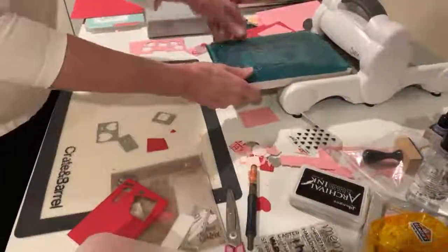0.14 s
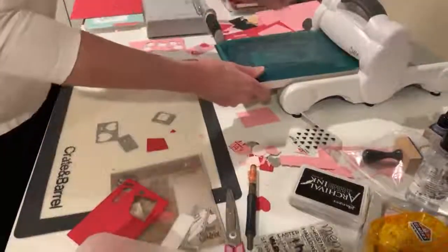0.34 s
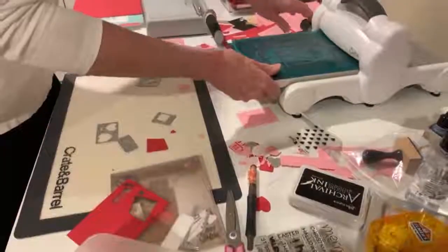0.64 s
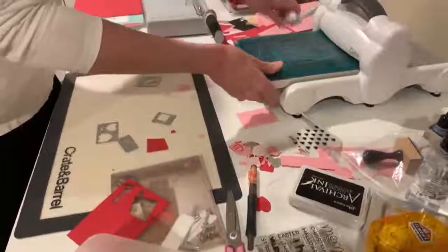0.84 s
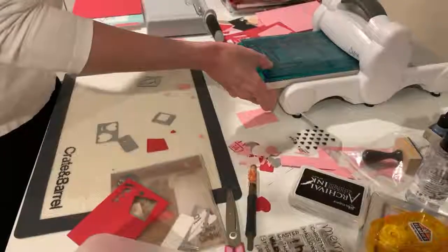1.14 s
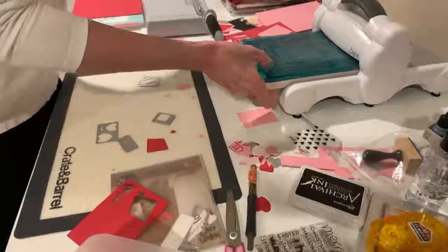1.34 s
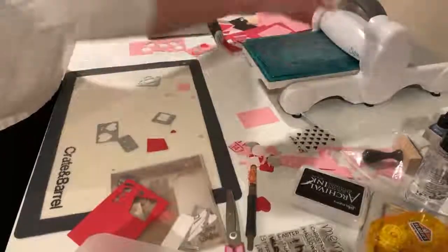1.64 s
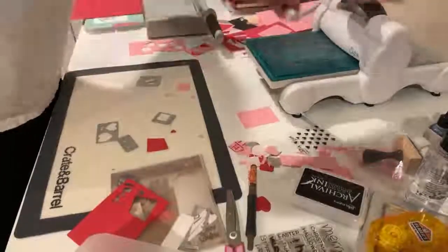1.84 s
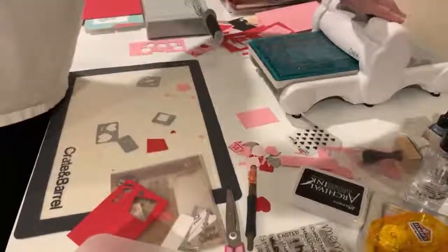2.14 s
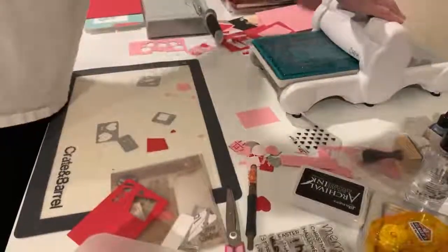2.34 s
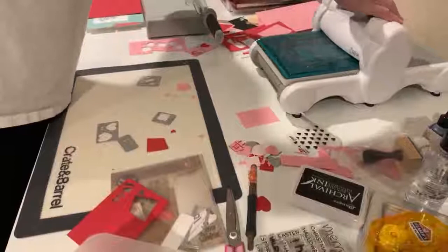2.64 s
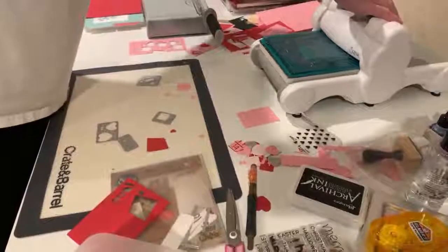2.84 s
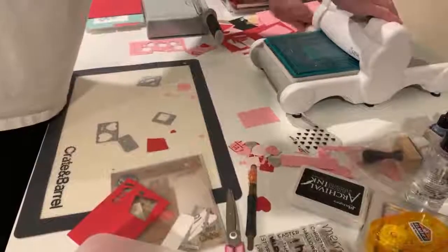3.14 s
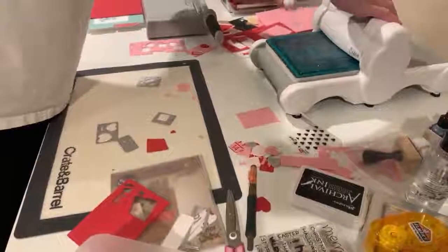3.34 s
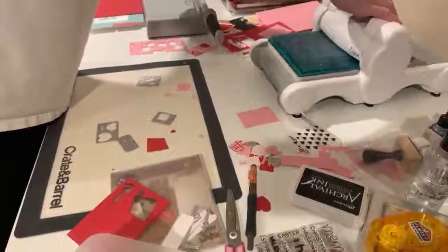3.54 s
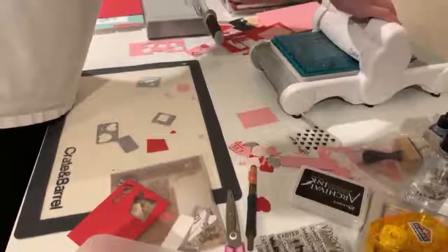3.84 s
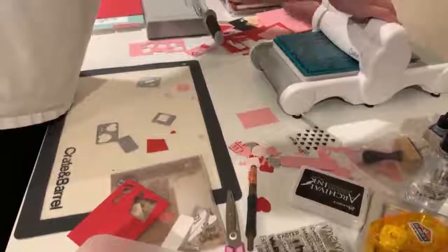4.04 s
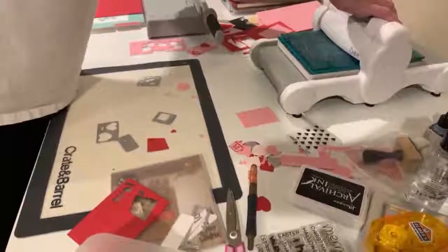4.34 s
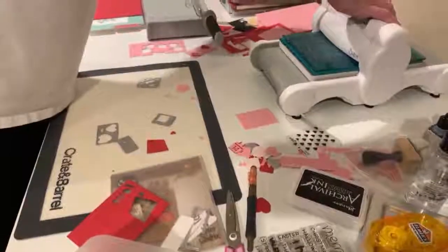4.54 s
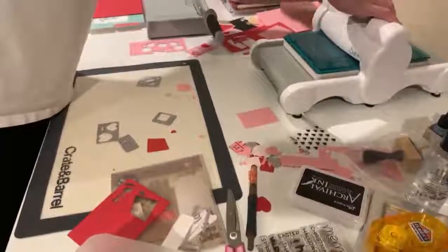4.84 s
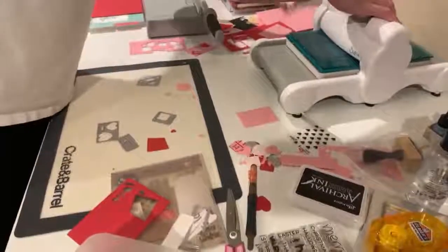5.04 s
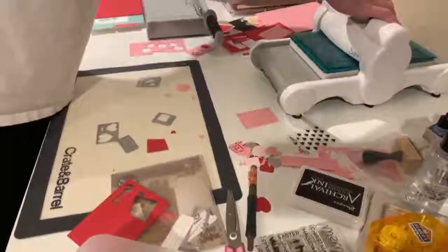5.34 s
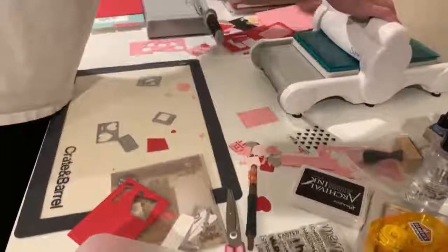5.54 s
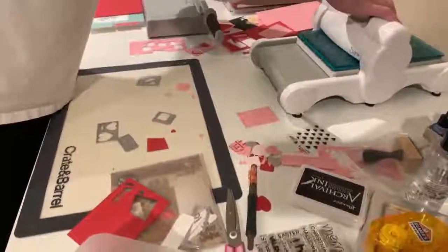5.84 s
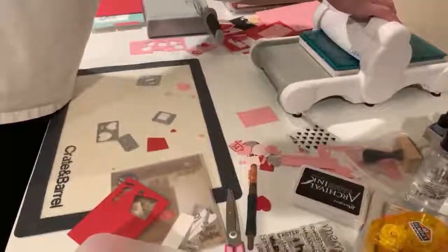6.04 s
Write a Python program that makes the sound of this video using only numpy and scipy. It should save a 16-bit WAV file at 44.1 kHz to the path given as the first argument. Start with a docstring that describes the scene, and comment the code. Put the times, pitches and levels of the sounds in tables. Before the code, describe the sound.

In a small dry room, a close phone microphone catches a few strong clacks and a short smooth scrape of plates, then fainter taps. A hand-cranked press creaks and judders in irregular pulses, its table answering with dull thumps. Near the middle come a tiny falling squeak and one sharp snap; afterwards only muted rumbling, ticks and knocks remain over soft hiss.

```python
"""A roller press turned by hand

On a craft table, plates knock and scrape as they slide in, then the crank turns. Uneven slips
rumble through shell and table; blows tick, a bearing squeaks and the die snaps through once.
Random clicks drive ringing resonances, and the squeak is a few sines. A small dry room and a soft hum
surround it all; a phone picks it up with noise suppression, a soft hiss and a cut top."""
import sys
import numpy as np
from scipy import signal
from scipy.fft import rfft, irfft
from scipy.io import wavfile
from scipy.ndimage import uniform_filter1d

SR = 44100
rng = np.random.default_rng(int(sys.argv[2]) if len(sys.argv) > 2 else 0)


def transcribe(u):
    """Save the signal u as a 16-bit wav file named by the first command-line argument.

    u: samples, shape (n,) or (channels, n), limited to [-1, 1]; the rate is SR.
    q: integer samples, one column per channel.
    """
    v = np.clip(np.atleast_2d(u).T, -1, 1)
    q = np.round(v * 32767).astype(np.int16)
    wavfile.write(sys.argv[1], SR, q)


N = 273420  # length in samples, 6.2 s


def hits():
    """Each blow makes a tick of its own colour and sets table, shell and plates ringing."""
    # Blows on plates and shell: t/s, tick level/dB, tick colour f/Hz, then thud, knock and edge level/dB
    # relative to the tick (all levels before the fixed trims below), chatter length/ms
    blow_table = [(0.0124, -36.5, 2070, -17, -10, -33.5, 36), (0.099, -33, 2040, 14, -13, -55, 13.3),
                  (0.146, -38, 1990, 14, 9, -55, 33), (0.3484, -65, 3770, 39, 6, -20, 14),
                  (0.4806, -51.5, 2200, -20, 13.5, -14, 41), (0.584, -47.5, 2200, 26, 20, -18, 14),
                  (0.6258, -41, 2000, 15.5, -13, -22, 21), (0.8078, -55, 2740, -9, 10.5, -19.5, 35),
                  (0.9487, -51, 3360, -6, 14.5, -39, 27), (1.0225, -60, 2500, 17, 0, -21, 19),
                  (1.1152, -72.5, 2320, 11, 0, -22, 30), (1.1608, -65.5, 2490, 16, -2, -10, 26),
                  (1.255, -67.5, 2310, 16, 13, -24, 90), (1.3309, -55, 2160, -12, 15, -31, 28),
                  (1.4032, -69, 1990, -3, 17, -25, 33), (1.476, -64, 2320, -9, 12, -40, 48),
                  (1.6477, -67.5, 2040, 25.5, 15.5, -32, 65), (1.6697, -53.5, 2300, 12, -16, -20, 32),
                  (1.912, -67, 2410, 16, 15, -15, 61), (2.2063, -66, 3240, 0, -6, -19, 30),
                  (2.3334, -67.5, 4540, 1, 12, -29, 34), (2.4106, -61.5, 2640, 16, 15.5, -18, 35),
                  (2.6195, -57, 3680, 13, 14.5, -16.5, 48), (2.7646, -59.5, 3710, 0, 11, -37, 42),
                  (2.8874, -56, 2110, -5.5, 8.5, -38.5, 38), (2.986, -65.5, 2100, 7.5, -7, -30, 62),
                  (3.0594, -51.5, 2550, -4, -6, -13.5, 30), (3.542, -63, 2180, -2.5, 13, -36, 21),
                  (3.5968, -59.5, 1880, 12, -21, -38, 30.5), (4.418, -45.5, 3130, -6, 4.5, -48, 35),
                  (4.7687, -78, 3380, 25, 13, -19, 27), (5.032, -69, 1820, 22, 9, -22, 30),
                  (5.3324, -79.5, 1840, 2, 13.5, -7, 26.6), (5.3726, -71.5, 2180, 37, 16.5, -16.5, 40),
                  (5.4459, -65, 2360, 11, 4, -29, 30), (5.6986, -75.5, 1920, 15, 2.5, -21.5, 23),
                  (5.7694, -72, 1920, 5, 14, -10.5, 28), (5.8894, -75, 1840, 16, 18, -18.5, 31),
                  (5.9595, -63.5, 2700, 1.5, 16, -33.5, 35), (6.1429, -70, 1840, 37, 7, -9.5, 19)]
    clack_hz, clack_width_hz, clack_db = 1456, 240, 8  # the plate stack clacks at every blow
    tick, edge, thud, knock = np.zeros((4, N))
    for s, db, hz, thud_db, knock_db, edge_db, length_ms in blow_table:
        blow = gain(db) * chatter(length_ms, per_s=2200, strike=13)
        coloured = gain(4) * band(blow, hz, hz / 4.1)
        clack = gain(clack_db) * band(blow, clack_hz, clack_width_hz)
        add(tick, s, coloured + gain(-6) * blow + clack)
        add(edge, s, gain(edge_db) * blow)
        add(thud, s, gain(thud_db) * blow)
        add(knock, s, gain(knock_db) * blow)
    low = bodies(gain(-12) * thud, gain(-18) * thud, gain(-10) * knock, top_hz=1500)
    return steep(tick, 950, 4900) + gain(4) * steep(edge, 5500, 15000) + low


def snap():
    """Steel breaks through card: a dense crackle coloured by plates and shell, plus a jolt."""
    # The die cuts through, a single row: t/s, level/dB, chatter length/ms
    s, db, length_ms = (3.228, -5.5, 36.4)
    # Colour of the crackle: f/Hz, level/dB
    snap_colour = [(88, -50), (150, -27.5), (300, -1), (675, -27.5), (1000, -11.5), (2020, -13),
                   (2450, -21.5), (2850, -11.5), (3300, -16), (7620, -15.5), (15100, -14.5), (16000, -20.5)]
    size = 16384  # samples
    burst = chatter(length_ms, per_s=6000, strike=2.1, count=size)
    hz, colour_db = np.transpose(snap_colour)
    bin_log_hz = np.log(np.arange(1, size // 2 + 2) * SR / size)
    log_gain = np.interp(bin_log_hz, np.log(hz), colour_db) * np.log(10) / 20
    # Fold the cepstrum (spectrum of the log gain) so that the colour follows the strike
    cepstrum = irfft(log_gain)
    cepstrum[1:size // 2] *= 2
    cepstrum[size // 2 + 1:] = 0
    coloured = irfft(rfft(burst) * np.exp(rfft(cepstrum)))
    crackle, jolt = np.zeros((2, N))
    add(crackle, s, gain(db) * coloured)
    add(jolt, s, gain(db) * burst)  # the same jolt shakes the whole press
    return crackle + bodies(gain(-53) * jolt, gain(-38.5) * jolt, gain(-41) * jolt, top_hz=2400)


def crank():
    """Shoved plates, then gears and rollers, judder into table and shell; the plates grind along."""
    # Changing rumble, plates shoved in at first, then the crank's uneven load: t/s,
    # rumble in the table level/dB, creak in the shell level/dB relative to the rumble
    rumble_path = [(0.0, -29, -9), (0.08, -46, -6), (0.26, -48, -0.5), (0.32, -58, 6), (0.4, -44.5, -16),
                   (0.62, -57.5, 0), (0.93, -69, 0), (1.5, -73, 5.5), (1.7, -59, -3.5), (2.1, -64.5, 4.5),
                   (2.33, -57, 2.5), (2.55, -64.5, -5.5), (2.85, -54.5, -1.5), (3.15, -63.5, 1.5),
                   (3.5, -66.5, -3), (3.85, -62.5, -10.5), (4.0, -71, -18), (4.4, -53, -6),
                   (4.75, -67.5, -13), (5.08, -56.5, -9), (5.35, -64.5, -7.5), (5.5, -59.5, -8.5),
                   (5.61, -65.5, -20), (5.92, -52.5, -15.5), (6.06, -66.5, -16), (6.15, -60.5, -9.5),
                   (6.2, -64.5, -12)]
    # Shudders after a blow or as the crank lurches on: peak t/s, rise per 20 dB/ms, fall per 20 dB/ms,
    # shell level/dB, plates level/dB
    shudder_table = [(0.03, 39, 68, -34.5, -32.5), (0.105, 15, 100, -38, -36.5),
                     (0.155, 34, 70, -32, -33.5), (0.366, 39, 145, -36, -36), (0.598, 47, 45, -34.5, -44.5),
                     (0.63, 20, 122, -45.5, -51), (0.829, 100, 74, -54, -53), (0.96, 20, 240, -53, -46.5),
                     (1.168, 22, 61, -54, -62.5), (1.259, 11, 156, -48.5, -54.5),
                     (1.34, 15, 300, -59.5, -62), (1.67, 180, 110, -52, -58),
                     (1.95, 160, 500, -53.5, -69.5), (2.23, 200, 88, -60, -61.5), (2.37, 55, 40, -64, -72),
                     (2.42, 23, 130, -52, -60), (2.638, 88, 95, -46.5, -57.5), (2.8, 220, 42, -52, -52),
                     (2.899, 54, 120, -51, -46.5), (3.068, 90, 78, -51.5, -50),
                     (3.24, 20.6, 77, -31, -32.5), (3.35, 50, 190, -60, -56), (3.571, 50, 133, -65, -55),
                     (3.63, 80, 170, -59, -63.5), (3.88, 150, 53, -59.5, -66.5),
                     (4.22, 136, 690, -63.5, -66), (4.45, 60, 115, -52.5, -51), (4.78, 40, 120, -58, -61.5),
                     (4.85, 85, 100, -57.5, -73), (5.0, 74, 250, -66, -65), (5.12, 60, 240, -56.5, -66),
                     (5.23, 150, 74, -60.5, -54.5), (5.39, 30, 170, -57, -53.5),
                     (5.49, 100, 70, -60, -59.5), (5.72, 78, 150, -58, -56.5), (5.92, 71, 40, -57, -59),
                     (5.98, 30, 89, -60.5, -58), (6.15, 35, 68, -61.5, -63.5)]
    grind_db = -7  # grind of the plates under the creak, rising and falling with it
    rumble_db, creak_db, _ = columns(rumble_path)
    # Doubled decibels turn gains into powers, so that the shudders can be added to creak and grind
    creak_power = gain(2 * (rumble_db + creak_db))
    grind_power = gain(2 * (rumble_db + creak_db + grind_db))
    for s, rise_ms, fall_ms, shell_db, plates_db in shudder_table:
        shape = swell(s, rise_ms / 1000, fall_ms / 1000) ** 2
        creak_power = creak_power + gain(2 * shell_db) * shape
        grind_power = grind_power + gain(2 * plates_db) * shape
    judder = slips(per_s=320, spread_db=2.206)
    grit = steep(slips(per_s=500, spread_db=4.4), 240, 1250)
    rumble = gain(rumble_db) * judder
    creak = np.sqrt(creak_power) * judder
    grind = np.sqrt(grind_power) * grit
    return bodies(rumble, creak, grind, top_hz=1250)


def slides():
    """Smooth plates rub over each other: fine dense grit with a brighter sheen."""
    # Slides: start t/s, hold/s, release per 20 dB/s, level/dB, sheen level/dB relative to the rub
    slide_table = [(0.348, 0.052, 0.135, -49, -4), (0.567, 0.011, 0.093, -54, -4.5),
                   (0.274, .05, 0.33, -69.5, -30), (0.609, 0.0064, 0.01, -59, -20),
                   (1.657, 0.015, 0.19, -65.5, -31), (1.744, 0.13, 0.43, -84.5, 8)]
    attack_s = 0.011  # per 20 dB
    grit = slips(per_s=5000, spread_db=7)
    rub = unit(steep(grit, 990, 4940))
    sheen = unit(steep(grit, 3600, 15000))
    out = np.zeros(N)
    for s, hold_s, release_s, db, sheen_db in slide_table:
        shape = swell(s + attack_s, attack_s, release_s, hold_s)
        out += gain(db) * shape * (rub + gain(sheen_db) * sheen)
    return out


def squeak():
    """A dry bearing sings at a shaky, falling pitch, catching as it turns."""
    # Path of the squeak: t/s, pitch f/Hz, level/dB
    squeak_path = [(2.822, 2450, -82.5), (2.829, 2400, -54.5), (2.85, 2340, -63.5), (2.88, 2296, -65.5),
                   (2.94, 2180, -94)]
    # Sines that make up its tone: multiple of the pitch, level/dB
    overtones = [(1, 1), (1.97, -1), (2.76, -15.5)]
    hz, db, on = columns(squeak_path)
    shake, catch = (unit(uniform_filter1d(rng.standard_normal(N), size=150)) for _ in range(2))
    phase = 2 * np.pi * np.cumsum(hz * (1 + 0.03 * shake)) / SR
    tone = sum(gain(overtone_db) * np.sin(k * phase) for k, overtone_db in overtones)
    return on * gain(db + 3.3 * catch) * tone


def bumps():
    """The table legs rock: slow soft pushes set off the table's lowest swing, which dies away."""
    # Rocking of the legs: t/s, level/dB before the onset and decay below
    bump_table = [(1.265, -57), (3.679, -51), (3.88, -61.5), (4.249, -57.5), (4.849, -54), (6.149, -59)]
    swing_hz, t60_s, onset_s = 67, .25, 0.0036  # t60 is the time to fall by 60 dB
    out, t = np.zeros(N), np.arange(SR // 2) / SR
    swing = (1 - np.exp(-t / onset_s)) * np.sin(2 * np.pi * swing_hz * t)
    for s, db in bump_table:
        add(out, s, gain(db - 60 * t / t60_s) * swing)
    return out


def bodies(thud, creak, knock, top_hz):
    """Pushes on table, shell and plates ring their resonances; soft contacts keep the treble out."""
    # Resonances of table top, plastic shell and plates, each: f/Hz, width/Hz, level/dB
    table_modes = [(109.9, 30, -13), (162, 9.8, 3), (190, 22, -3.5), (225.4, 18, 1)]
    shell_modes = [(293.7, 25, -0.5), (357, 35, -3), (408.6, 18, 0), (480, 90, -9.5), (538, 27, -2),
                   (620, 38, -8.5)]
    plate_modes = [(681.6, 50, 0.5), (813.5, 30, 0.5), (861, 47, -2.5), (922, 50, 1.5), (1067.6, 60, -1.5),
                   (1200, 120, -4.5), (1516, 270, -1), (1800, 600, -16.5)]
    table = steep(ring(thud, table_modes), 51, 460)
    shell = steep(ring(creak, shell_modes), 120, 720)
    plates = steep(ring(knock, plate_modes), 270, top_hz)
    return table + shell + plates


def ring(x, modes):
    """A body answers with its resonances, scaled so that noise roughly keeps its level."""
    out, power = 0, 0
    for k, (hz, width, db) in enumerate(modes):
        out = out + (-1) ** k * gain(db) * band(x, hz, width)  # neighbours have opposite signs
        power += gain(2 * db) * np.pi * width / SR
    return out / np.sqrt(power)


def chatter(length_ms, per_s, strike, count=8192):
    """One contact: a first strike, then a dying run of smaller slips."""
    t_ms = 1000 * np.arange(count) / SR
    bite = 1 - np.exp(-t_ms / 1.3)  # the slips take about 1.3 ms to set in
    decay = np.exp(-(t_ms / max(length_ms, 2)) ** 1.1)
    burst = slips(per_s, spread_db=1.8, count=count) * decay * bite
    burst[0] = strike
    return burst


def slips(per_s, spread_db, count=N):
    """Surfaces that stick and slip: random clicks of uneven size and sign, overall level (rms) 1."""
    when, size, sign = rng.random((count, 3)).T
    size_db = np.minimum(-spread_db * np.log(1 - size), 12)
    clicks = (when < per_s / SR) * gain(size_db) * np.sign(sign - .5)
    return unit(clicks + 1e-9)  # the tiny offset avoids dividing by zero


def swell(peak_s, rise_s, fall_s, hold_s=0):
    """Gain that climbs 20 dB in every rise_s up to 1, holds, and drops 20 dB in every fall_s."""
    t = np.arange(N) / SR - peak_s
    steps_down = np.maximum(-t / rise_s, (t - hold_s) / fall_s)
    return gain(-20 * np.maximum(steps_down, 0))


def band(x, hz, width):
    """Two-pole resonance with gain 1 at its centre, like a body that favours one pitch."""
    return signal.lfilter(*signal.iirpeak(min(hz, .45 * SR), hz / width, fs=SR), x)


def steep(x, low_hz, high_hz):
    """Keep one frequency band, with a steep fall on both sides."""
    return signal.sosfilt(signal.butter(3, [low_hz, high_hz], "band", fs=SR, output="sos"), x)


def gain(db):
    """Turn decibels into a factor."""
    return 10 ** (np.asarray(db) / 20)


def unit(x):
    """Scale a signal to an overall level (rms) of 1."""
    return x / np.sqrt(np.mean(x ** 2))


def columns(table):
    """Table columns drawn out sample by sample, and a gate that is 1 while the table lasts."""
    s, *rest = np.transpose(table)
    t = np.arange(N) / SR
    return [np.interp(t, s, c) for c in rest] + [(t >= s[0]) & (t <= s[-1])]


def add(track, s, x):
    """Mix x into the track from s seconds on, cut off at the track's end."""
    i = int(s * SR)
    track[i:i + len(x)] += x[:N - i]


def room(x):
    """Direct sound, then a diffuse noise tail that dies faster in the treble."""
    # Bands of the tail: f/Hz, time to fall by 60 dB/s, level/dB
    room_bands = [(302.3, .3, 8), (1000, 0.34, -6), (2570, 0.32, 18), (8000, 0.28, -11.5),
                  (13000, 0.14, -15)]
    tail_db, gap_s = -11, .004
    t = np.arange(SR // 2) / SR
    noise = rng.standard_normal(len(t))
    tail = sum(gain(db - 60 * t / t60) * band(noise, hz, 1.3 * hz) for hz, t60, db in room_bands)
    tail = tail * (t > gap_s)
    tail = tail / np.sqrt(np.sum(tail ** 2))
    return x + gain(tail_db) * signal.fftconvolve(x, tail)[:N]


def low_hum():
    """A steady low hum: noise passed through two broad low resonances."""
    noise = rng.standard_normal(N)
    return gain(-66.5) * unit(band(band(noise, 99, 150), 150, 450))


def suppress(x):
    """Noise suppressor: bands whose smoothed level sinks under the threshold are pulled down."""
    # Suppressor threshold: f/Hz, level/dB
    threshold_table = [(100, -89), (1000, -75.5), (2000, -80.5), (6000, -77.5), (16000, -61.5)]
    hz, _, z = signal.stft(x, SR, nperseg=512)
    across_bands = uniform_filter1d(np.abs(z) ** 2, size=9, axis=-2)
    power = uniform_filter1d(across_bands, size=3, axis=-1) * 256  # also smoothed over time
    edge_hz, edge_db = np.transpose(threshold_table)
    threshold = gain(2 * np.interp(np.log(hz + 1), np.log(edge_hz), edge_db))[:, None]
    return signal.istft(z * power / (power + threshold), SR)[1][..., :N]


def scene():
    """The press and its table sound in the room, over a low hum."""
    press = hits() + snap() + crank() + slides() + squeak() + bumps()
    return (room(press) + low_hum())[None]


def record(dry):
    """The microphone loses deep bass, faint sound is suppressed, electronics hiss, the top is cut."""
    no_bass = signal.sosfilt(signal.butter(3, 60, "high", fs=SR, output="sos"), dry)
    hiss = gain(-80.5) * band(rng.standard_normal(N), 1300, 7000)
    heard = suppress(no_bass) + hiss
    return signal.sosfilt(signal.ellip(10, .2, 50, 16000, fs=SR, output="sos"), heard)


dry = scene()
out = record(dry)
transcribe(out)
```